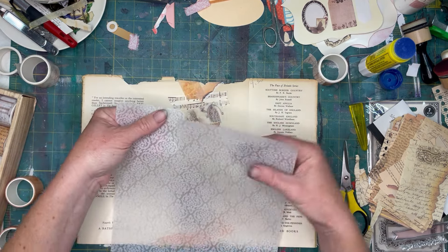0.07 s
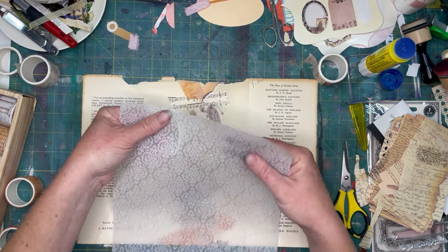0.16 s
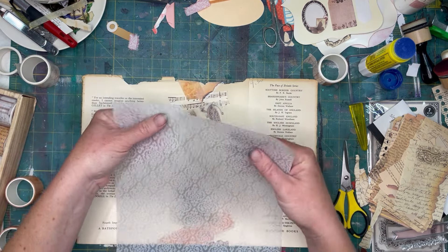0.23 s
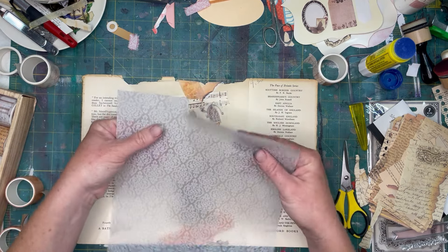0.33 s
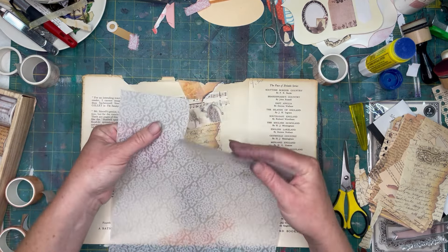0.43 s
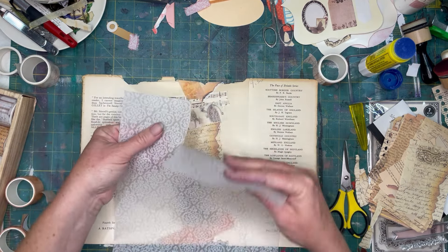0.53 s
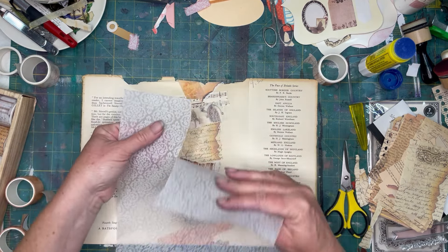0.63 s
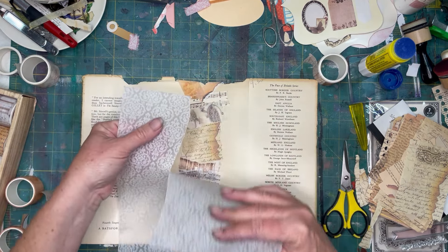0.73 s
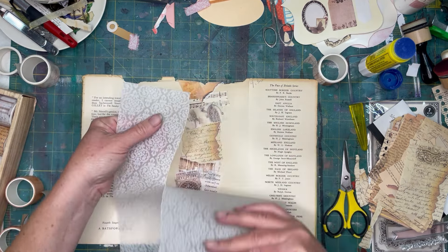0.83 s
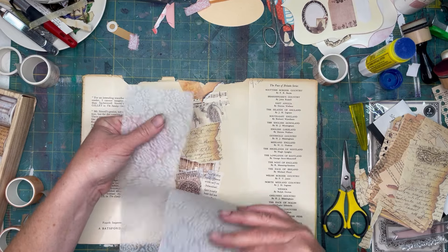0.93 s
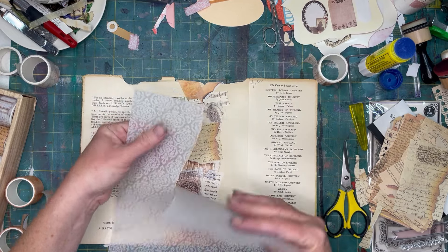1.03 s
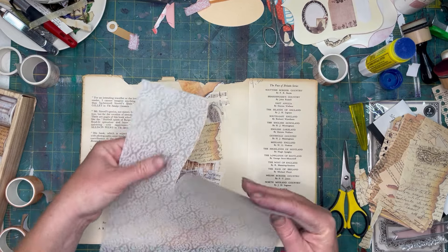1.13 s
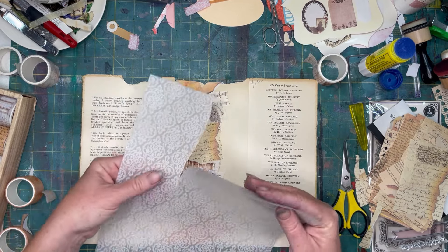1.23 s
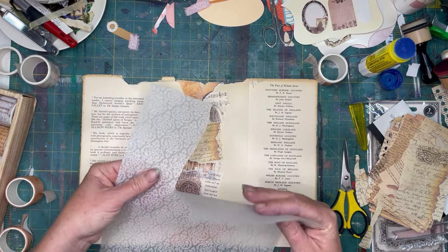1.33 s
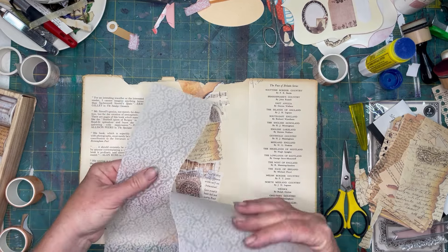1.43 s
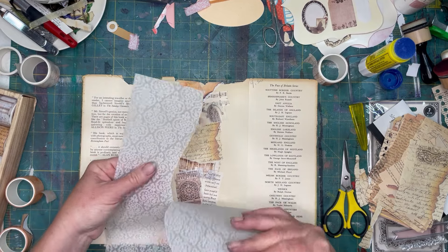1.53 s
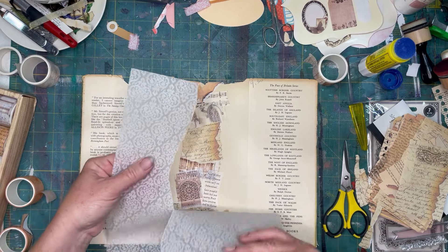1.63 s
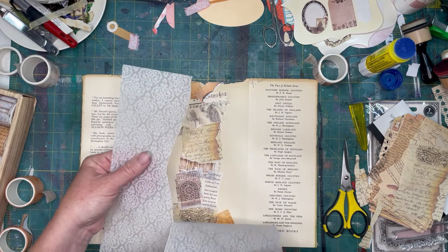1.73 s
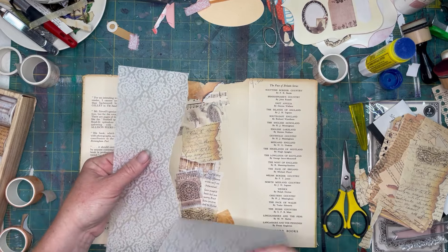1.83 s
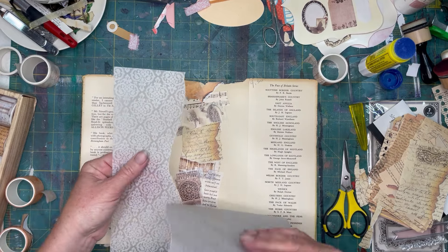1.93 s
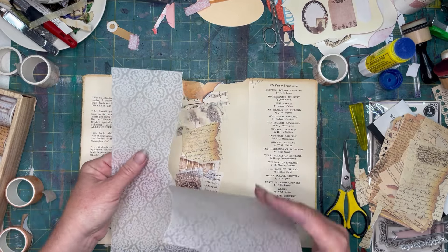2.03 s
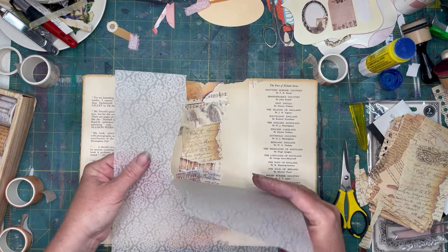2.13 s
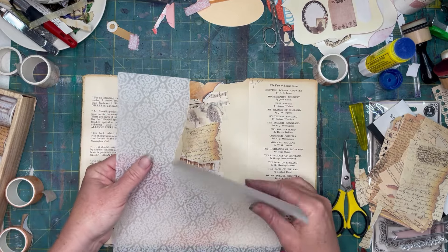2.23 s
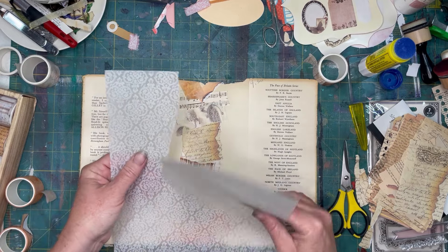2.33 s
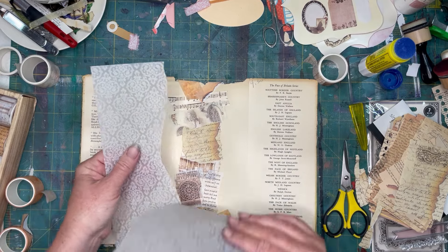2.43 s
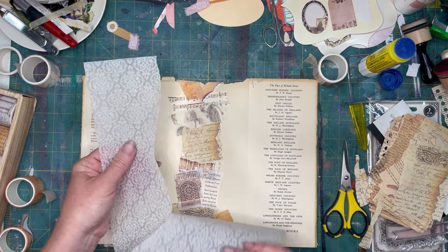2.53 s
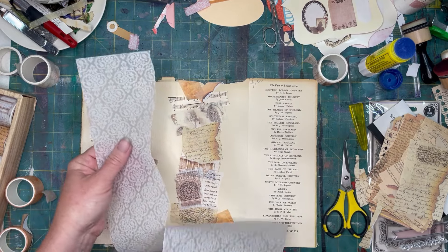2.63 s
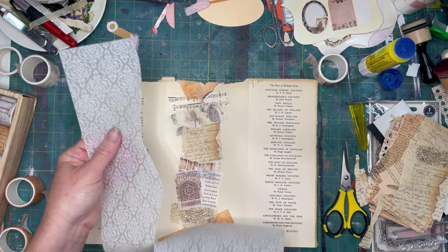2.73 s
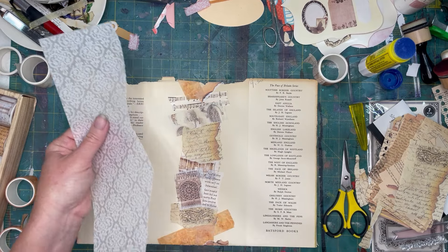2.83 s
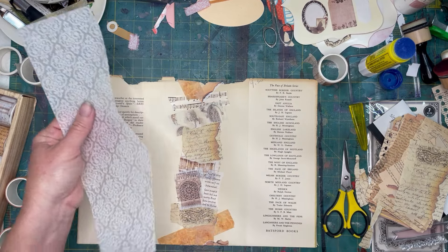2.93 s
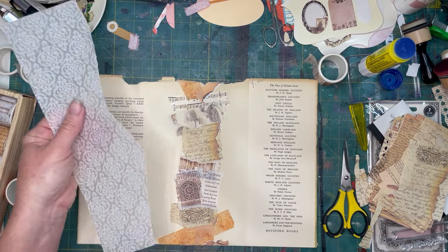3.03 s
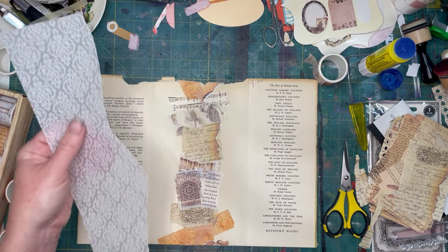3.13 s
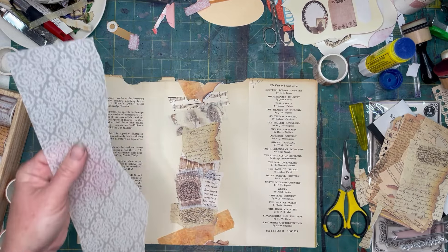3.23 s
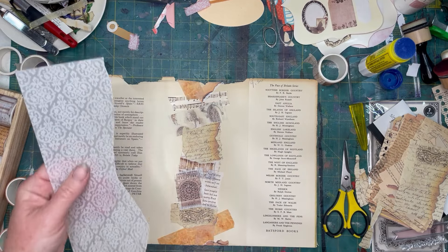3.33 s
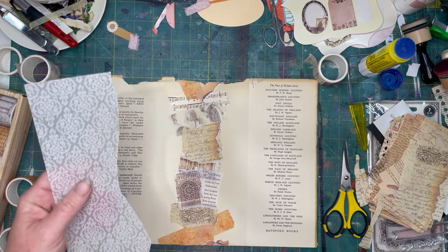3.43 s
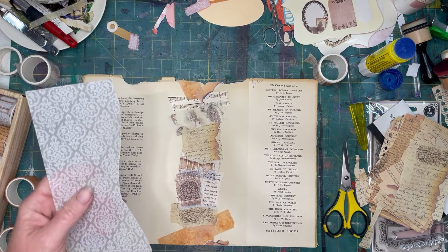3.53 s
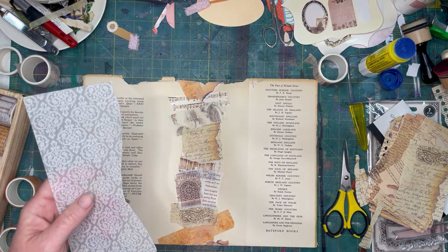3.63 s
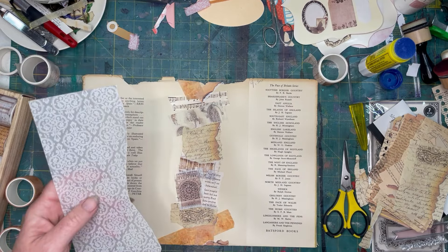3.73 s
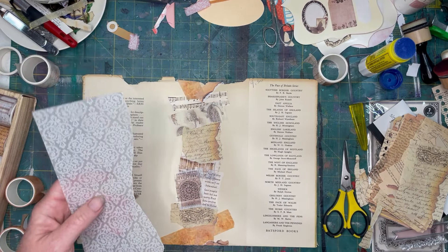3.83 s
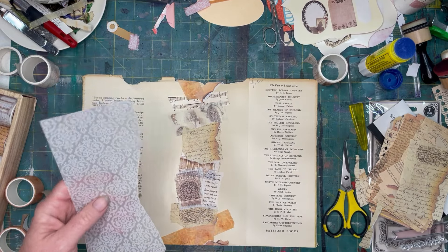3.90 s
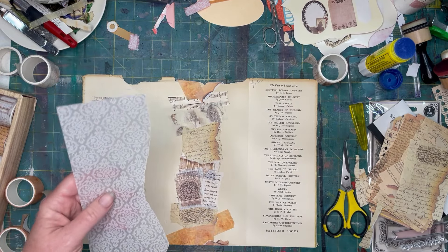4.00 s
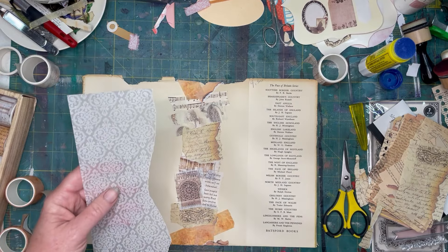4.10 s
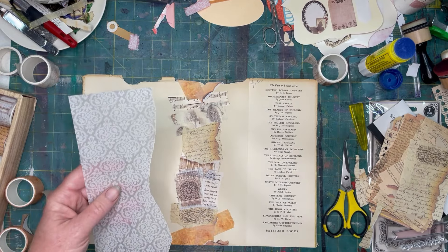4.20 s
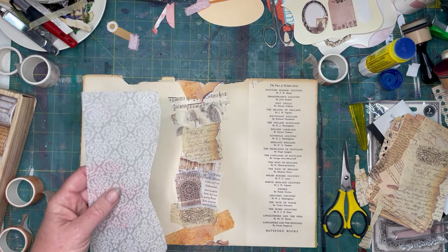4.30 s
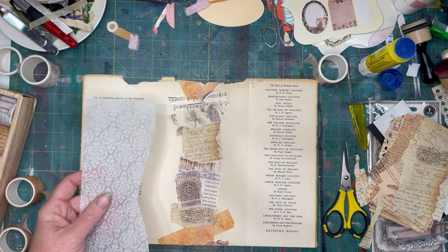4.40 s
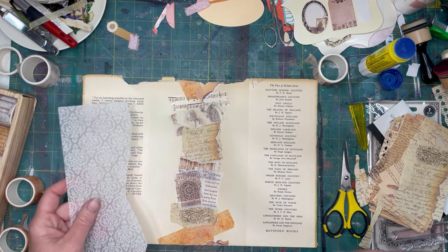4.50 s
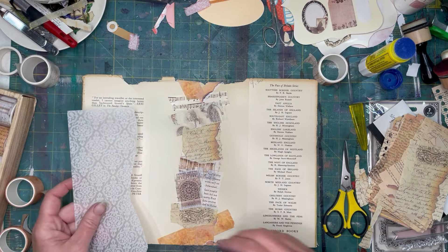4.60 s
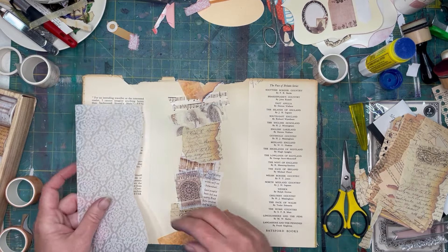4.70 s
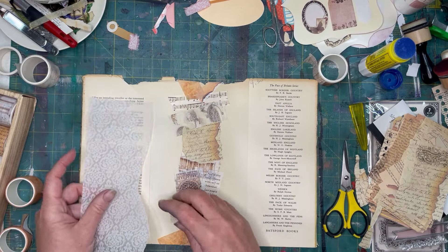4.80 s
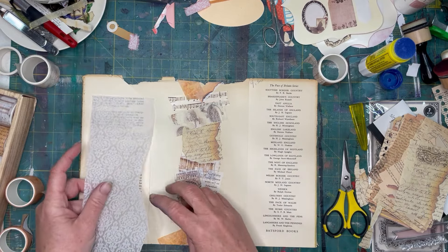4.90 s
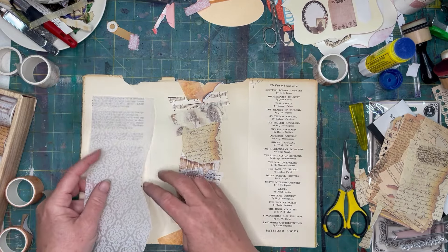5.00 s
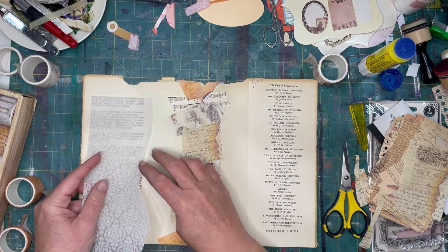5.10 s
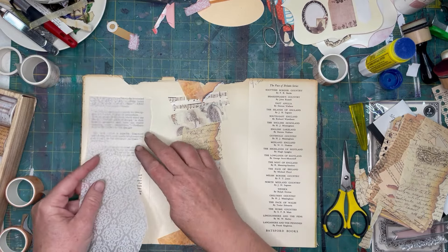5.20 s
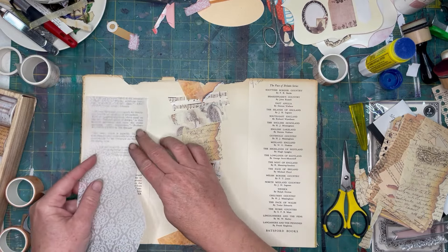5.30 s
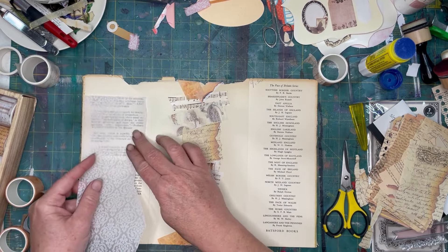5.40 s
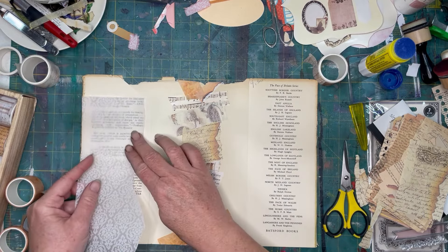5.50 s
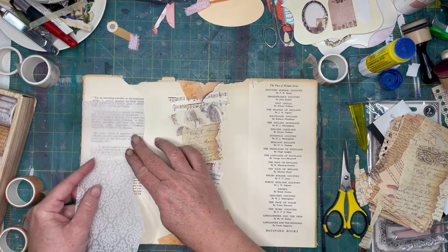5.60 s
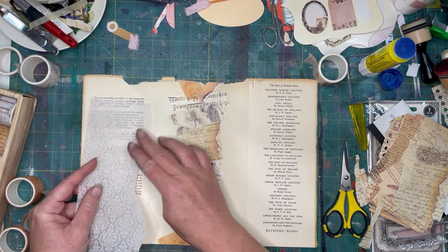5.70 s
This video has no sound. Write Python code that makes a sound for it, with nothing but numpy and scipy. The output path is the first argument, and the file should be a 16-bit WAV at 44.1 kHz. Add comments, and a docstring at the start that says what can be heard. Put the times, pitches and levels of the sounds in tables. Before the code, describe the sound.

Three short, crisp rips of thin paper by hand, with rustling and crease crackles between, then a sharp snap and faint finger strokes.

```python
"""Three short rips of thin paper, torn by hand at a craft table under a small stereo microphone.
Around them the sheet rustles, creases crackle, a fingernail snaps off an edge and fingers slide on a page.
A low room hum and a faint microphone hiss lie underneath. Rips, rustle and strokes are noise built of breaking
fibres; creases are short coloured bursts, the snap is a set of decaying sines, hum and hiss are filtered noise.
Two ports hear it all with differing phase and level, plus a short room tail."""
import sys
import numpy as np
from scipy import signal
from scipy.fft import rfft, irfft, next_fast_len
from scipy.io import wavfile
from scipy.ndimage import uniform_filter1d, map_coordinates

SR = 44100
rng = np.random.default_rng(int(sys.argv[2]) if len(sys.argv) > 2 else 0)


def master(y):
    """Save y as 16-bit WAV."""
    cut = np.clip(np.atleast_2d(y).T, -1, 1)
    pcm = np.round(cut * 32767)  # scale
    wavfile.write(sys.argv[1], SR, pcm.astype(np.int16))


N = 253573

# colour of tearing paper, shared by rips and bursts: f/Hz, level/dB
TEAR_COLOUR = [(200, -16.5), (310, -14.5), (420, -2.5), (520, -4.5), (680, -6.5), (820, -4), (950, -3.5),
               (1350, -1), (2100, -6), (2800, -5), (4000, -9.5), (5300, -12), (7500, -11), (10000, -13.5),
               (13000, -23), (15700, -20)]
LOW_HZ, HIGH_HZ = 900, 3600  # borders between flutter, crackle and fizz


def rips():
    """The tear runs through the sheet; bright patches come and go as the loose flap changes shape."""
    # one list per rip, three bands of the tear: t/s, flutter/dB, crackle/dB, fizz/dB
    tears = [
        [(0.584, -50, -40.5, -37.5), (0.594, -35, -34, -32.5), (0.61, -39, -36, -32),
         (0.658, -39.5, -34, -31.5), (0.674, -32, -33, -33.5), (0.692, -45.5, -32.5, -34),
         (0.736, -39.5, -29, -28.5), (0.802, -39.5, -31.5, -29.5), (0.816, -34.5, -31, -37),
         (0.828, -41, -33, -27.5), (0.854, -30.5, -31, -29), (0.864, -46, -35.5, -36),
         (0.88, -35, -35.5, -28.5), (0.888, -43, -38.5, -38)],
        [(1.486, -42, -32.5, -30), (1.512, -35.5, -33, -34.5), (1.524, -47.5, -36, -34),
         (1.56, -40, -33, -36.5), (1.598, -36.5, -31.5, -35.5), (1.62, -40, -32.5, -35),
         (1.648, -44, -34.5, -29), (1.658, -40, -35.5, -35), (1.666, -33, -32, -31), (1.676, -36, -33.5, -35),
         (1.694, -41, -36.5, -32.5), (1.708, -37, -32.5, -33), (1.774, -44, -38, -38),
         (1.778, -40.5, -34.5, -45.5)],
        [(2.528, -35, -35, -37), (2.544, -41.5, -32, -38), (2.556, -35.5, -29, -34), (2.58, -38.5, -34.5, -34),
         (2.614, -39, -33, -31), (2.63, -41.5, -33, -36), (2.67, -40.5, -32.5, -33.5),
         (2.696, -41.5, -32.5, -30), (2.72, -37, -33.5, -29), (2.756, -39, -33, -30), (2.808, -40, -30, -27.5),
         (2.846, -40.5, -31.5, -29), (2.878, -44, -29.5, -29.5), (2.899, -37, -31.5, -33)],
    ]
    # bands the loose flap favours for a while: start/s, end/s, f/Hz, lift/dB
    # (rows that end well before they start do nothing)
    flap_patches = [(0.579, 0.632, 2400, 5), (0.47, 0.606, 2900, 4.5), (0.632, 0.664, 3100, 7.5),
                    (0.58, 0.668, 2300, 4.5), (0.585, 0.615, 1200, 5), (0.645, 0.668, 2500, 3),
                    (0.81, 0.55, 7000, 2.5), (0.69, 0.73, 3300, 3), (0.592, 0.62, 6100, 7),
                    (0.588, 0.89, 750, -6), (0.64, 0.86, 5300, 3.5), (0.668, 0.892, 370, 5),
                    (0.687, 0.89, 1450, 4), (0.715, 0.81, 5100, 5), (0.725, 0.81, 6200, 4.5),
                    (0.818, 0.89, 5100, 5.5), (0.828, 0.86, 6200, 4.5), (0.818, 0.835, 3500, 4),
                    (0.865, 0.89, 3800, 3.5), (1.481, 1.54, 1400, 5.5), (1.54, 1.58, 1900, 7),
                    (1.58, 1.62, 1600, 8), (1.2, 1.782, 760, -4.5), (1.484, 1.52, 3300, 8.5),
                    (1.3, 2.1, 5500, 2.5), (1.547, 1.6, 3950, 7), (1.628, 1.656, 1400, 4),
                    (1.622, 1.66, 2000, 7.5), (1.7, 1.76, 2600, 8.5), (1.698, 1.74, 5840, 7.5),
                    (2.536, 2.7, 1350, 7), (2.7, 2.775, 1680, 8), (3, 2.78, 2600, 3),
                    (3.1, 2.885, 1500, 2.5), (3, 2.3, 5200, 4.5), (3.4, 3.2, 3560, 6.5),
                    (3.3, 2.83, 4960, 7), (2.796, 2.848, 2780, 10), (2.848, 2.903, 2750, 5),
                    (2.53, 2.66, 990, 1.5), (2.848, 3.4, 6670, 2.5)]
    rise_db_s, fall_db_s = 1204, 1501.5
    flutter_lag = 0.45  # share of the edge slope: flutter comes and goes more slowly
    rip_edges = [edges(rows[0][0], rows[-1][0], rise_db_s, fall_db_s) for rows in tears]
    edge_db = np.max(rip_edges, axis=0)
    flutter_db, crackle_db, fizz_db = curves(np.concatenate(tears))
    torn = fibres(spiky_db=2.0, clump_db=0.9, patchy_db=1.3, pops_db=12.5, snaps_db=16.5, slow_share=.3)
    torn = patched(torn, flap_patches)
    return sheet(torn, TEAR_COLOUR, flutter_db + flutter_lag * edge_db, crackle_db + edge_db, fizz_db + edge_db)


def handling():
    """Fingers rub and bend the loose sheet until it is laid down: clumpier, more uneven breaks."""
    # hands moving the sheet: t/s, rustle/dB, tilt toward the treble/dB
    moves = [(0.0, -59.5, -0.5), (0.09, -63.5, 7), (0.138, -57.5, -6.5), (0.306, -58.5, 3.5),
             (0.486, -54, 0), (0.56, -65, -2), (0.9, -51.5, 0.5), (0.99, -46, 0), (1.012, -56.5, 10.5),
             (1.03, -49, -2.5), (1.058, -61, 0), (1.2, -60, -2.5), (1.27, -57.5, -3.5), (1.335, -68, 0.5),
             (1.37, -54, 2), (1.42, -62, -2), (1.45, -54.5, -4), (1.834, -54, -1), (1.974, -67, 5),
             (2.17, -61, 6.5), (2.235, -59.5, 4.5), (2.294, -50.5, -5.5), (2.444, -58, 0.5), (2.47, -47, 2),
             (2.92, -51.5, -1), (2.96, -52.5, -5), (3.03, -56, -7.5), (3.08, -48, -2), (3.12, -54, -3.5),
             (3.15, -56.5, -2), (3.185, -57, -4), (3.21, -63.5, 7), (3.41, -63.5, 4), (3.538, -59.5, -2),
             (3.6, -63, -2), (3.78, -70.5, 1), (3.87, -57.5, -6.5), (3.9, -65, 2), (3.94, -63.5, 1),
             (3.99, -73.5, 5), (4.058, -58.5, -7), (4.152, -56, 0), (4.2, -61, 1), (4.29, -62.5, 0.5),
             (4.36, -65.5, 3), (4.41, -61.5, 1), (4.458, -58.5, 0), (4.5, -61.5, 4), (4.55, -61.5, 4),
             (4.6, -59.5, 4), (4.626, -48.5, 3.5), (4.645, -54, 4.5), (4.662, -61, 0.5), (4.72, -63.5, 8.5),
             (4.79, -57.5, 2), (4.9, -68, 2.5)]
    # rubbing colour: f/Hz, level/dB
    rub_colour = [(200, -2), (350, -1.5), (650, -4), (900, -6), (1350, -3.5), (2800, -6.5), (4000, -10),
                  (7500, -12), (10000, -16.5), (13000, -24), (15700, -21)]
    rustle_db, tilt_db = curves(moves)
    held = np.clip((moves[-1][0] - np.arange(N) / SR) * 20, 0, 1)  # fades over the last 50 ms
    rubbed = fibres(spiky_db=0.5, clump_db=4.5, patchy_db=3.0, pops_db=14.0, snaps_db=13.0)
    flutter_db = rustle_db - 3 - tilt_db
    fizz_db = rustle_db - 1.5 + tilt_db
    return held * sheet(rubbed, rub_colour, flutter_db, rustle_db, fizz_db)


def creases():
    """Creases buckle at once; scrunches build up over some milliseconds."""
    # sharp creases: t/s, nominal peak/dB, pitch f/Hz, treble before the bite/dB, t60/s
    sharp_creases = [(0.106, -38, 1170, -19, 0.033), (0.122, -40.5, 1180, -19, 0.027),
                     (0.149, -24.5, 2880, -17, 0.046), (0.174, -39, 1300, -17.5, 0.054),
                     (0.226, -29.5, 1500, -4.5, 0.09), (0.232, -19.5, 1300, -5, 0.026),
                     (0.251, -31.5, 1160, -0.5, 0.062), (0.284, -34, 1294, 3.5, 0.036),
                     (0.2905, -22, 2640, -2.5, 0.028), (0.293, -22.5, 1920, -8, 0.044),
                     (0.355, -27, 830, -22.5, 0.045), (0.469, -34, 1120, -15.5, 0.18),
                     (0.581, -26, 2580, -15.5, 0.035), (0.592, -21, 2680, -6.5, 0.04),
                     (0.7395, -17, 1995, -2, 0.012), (0.929, -31.5, 2930, -16, 0.065),
                     (0.974, -27.5, 2830, -11, 0.063), (1.018, -25, 2090, -9.5, 0.049),
                     (1.224, -31, 1100, -21, 0.14), (1.345, -29.5, 1290, -24, 0.088),
                     (1.428, -19.5, 2860, -11, 0.048), (1.472, -28.5, 2490, -9.5, 0.082),
                     (1.6642, -9.5, 1290, -7.5, 0.022), (1.667, -10.5, 1300, -11.5, 0.02),
                     (1.768, -30.5, 5500, 1.5, 0.017), (1.772, -25, 2920, -8, 0.018),
                     (1.774, -26.5, 1300, -20.5, 0.06), (1.865, -19.5, 1380, -24.5, 0.085),
                     (1.866, -18.5, 2950, -19, 0.04), (1.938, -34, 810, -23.5, 0.17),
                     (2.254, -30, 955, -27, 0.076), (2.303, -44, 1180, -9.5, 0.053),
                     (2.334, -20, 3140, -7.5, 0.03), (2.335, -24, 1070, -20.5, 0.1),
                     (2.46, -35, 1500, -12, 0.05), (2.469, -21.5, 770, -29.5, 0.041),
                     (2.526, -29, 1420, -7, 0.21), (3.163, -34.5, 850, -18, 0.06),
                     (3.833, -25.5, 3500, -22, 0.018), (4.06, -44, 980, -24.5, 0.15),
                     (4.078, -39.5, 1110, -14.5, 0.061), (4.44, -46, 1500, -23, 0.089),
                     (4.815, -32.5, 1290, -28, 0.04), (4.897, -41, 4000, -6.5, 0.02),
                     (5.171, -55, 3320, -0.5, 0.034), (5.499, -62, 3880, 3.5, 0.04),
                     (5.661, -57.5, 4260, 8, 0.069)]
    # scrunches that swell and fade: t/s, nominal peak/dB, pitch f/Hz, treble before the bite/dB, t60/s
    soft_scrunches = [(0.139, -29, 1200, -30.5, 0.06), (0.148, -22.5, 1260, -31, 0.051),
                      (0.213, -34, 1850, -4, 0.026), (0.233, -29.5, 1540, -6, 0.04),
                      (0.262, -25.5, 1400, -15.5, 0.05), (0.274, -28.5, 1180, -12, 0.051),
                      (0.295, -26, 1400, -9.5, 0.021), (0.429, -36, 1240, -27, 0.057),
                      (0.56, -24.5, 2520, -4.5, 0.025), (1.284, -37, 835, -16, 0.074),
                      (2.276, -35.5, 2530, -6, 0.04), (2.392, -34.5, 1600, -13.5, 0.035),
                      (2.488, -33.5, 987, -12.5, 0.09), (1.806, -36.5, 1300, -4.5, 0.065),
                      (1.852, -38, 1300, -21.5, 0.05), (2.906, -24, 1145, -20, 0.13),
                      (2.926, -37, 1000, -1, 0.04), (2.978, -24, 1003, -14, 0.1),
                      (2.989, -26.5, 1080, -2, 0.048), (2.998, -26.5, 980, -9, 0.033),
                      (3.058, -28, 2530, -23.5, 0.055), (3.124, -46, 5940, 6.5, 0.079),
                      (3.178, -52, 2350, 7, 0.077), (3.197, -50.5, 2330, 9, 0.05),
                      (3.808, -41.5, 1200, -31, 0.3), (3.868, -42.5, 830, -10, 0.075),
                      (5.284, -51, 1530, -19, 0.033)]
    crest_db, crisp_db = 10.5, 5  # peak of a burst over its body; extra bite of its treble
    thin_hz = 298  # a thin sheet gives little below this
    out = np.zeros(N + SR)
    # rise in s; click is the buckling itself, a spike in rms of the noise before colouring
    for table, rise, click in ((sharp_creases, .0008, 3.65), (soft_scrunches, 0.0098, 0)):
        for s, db, pitch_hz, treble_db, t60 in table:
            crackle = burst(pitch_hz, treble_db + crisp_db, rise, t60, click)
            onset = round((s - .7 * rise) * SR)
            out[onset:][:len(crackle)] += amp(db - crest_db) * crackle
    return filtered(out[:N], lambda hz: (1j * hz / (1j * hz + thin_hz)) ** 2)


def snap():
    """A taut edge slips off the nail: decaying modes ring for a few ms as a noise burst makes the sheet shiver."""
    # nail snaps: t/s, level before a 2.5 dB lift/dB
    nail_snaps = [(4.7403, -8)]
    # ringing modes of the edge: f/Hz, level/dB, t60/s
    edge_modes = [(490, -25.5, 0.019), (1210, -7.5, 0.0078), (1986, 0.5, 0.0069), (3010, -2.5, 0.0044),
                  (4880, -4, 0.0079), (5260, -2, 0.01), (6990, 8.5, 0.0043), (8870, -4.5, 0.0045),
                  (10400, 2, 0.0073)]
    out, t = np.zeros(N + SR), np.arange(8192) / SR
    for s, db in nail_snaps:
        ring = np.zeros(len(t))
        for k, (hz, level, t60) in enumerate(edge_modes):
            ring += amp(level - 60 * t / t60) * (-1) ** k * np.sin(2 * np.pi * hz * t)
        shiver = amp(-24.0) * burst(2200, 6.3, 0.0029, 0.03)
        attack = (1 - np.exp(-t / 0.00052)) ** 2
        out[round(s * SR):][:len(t)] += amp(db + 2.5) * attack * (ring + shiver)
    return out[:N]


def strokes():
    """Skin slides over the page: a soft, bright friction noise over the dull body of the book."""
    # fingers smoothing the page:
    # start/s, end/s, level at start/dB, level at end/dB, relative fine hiss/dB, scratch f/Hz, its lift/dB
    finger_strokes = [(4.876, 4.982, -62.5, -60.5, -7.5, 4230, 4),
                      (5.015, 5.05, -60, -59.5, -10.5, 3600, 9), (5.065, 5.098, -62, -61, -9, 3900, 7),
                      (5.116, 5.152, -69.5, -74, 0.5, 3900, 2), (5.163, 5.27, -67, -64.5, -0.5, 3000, 4),
                      (5.407, 5.441, -68, -63, -3, 3100, 1), (5.52, 5.637, -63.5, -63, -2.5, 4100, 4.5),
                      (5.659, 5.763, -62.5, -59.5, -2.5, 4000, 2)]
    # skin on the page: f/Hz, level/dB
    page_colour = [(220, -17.5), (340, -3.5), (500, -12.5), (900, -18), (1350, -2), (2100, -4), (2800, 2.5),
                   (4300, -2.5), (5300, -8.5), (7500, -14), (10000, -20.5), (13000, -28), (15700, -26)]
    rise_db_s, fall_db_s, resting_db = 896, 700, -83  # edges of a stroke; fingers at rest
    book_s, book_db, book_rest_db = (4.42, 4.88), -63, -89  # the sheet is laid on the book, whose body rumbles
    book_rise_db_s, book_fade_db_s = 34, 56

    points = []
    for start, end, start_db, end_db, fine, *_ in finger_strokes:
        points += [(start, start_db, fine), (end, end_db, fine)]
    level_db, fine_db = curves(points)
    edge_db = np.max([edges(a, b, rise_db_s, fall_db_s) for a, b, *_ in finger_strokes], axis=0)
    touch_db = edges(finger_strokes[0][0], N / SR, rise_db_s, 0)
    friction_db = np.maximum(level_db + edge_db, resting_db + touch_db)
    body_db = np.maximum(book_db + edges(*book_s, book_rise_db_s, book_fade_db_s), book_rest_db)

    skin = fibres(spiky_db=4.0, clump_db=1.5, patchy_db=1.8, pops_db=10.5, snaps_db=14.5)
    skin = patched(skin, [(a, b, hz, lift_db) for a, b, *_, hz, lift_db in finger_strokes])

    def bands(hz):
        body = 1 / (1 + (hz / 650) ** 8)
        fine = 1 / (1 + (6000 / (hz + 1)) ** 8)
        return amp(along(page_colour, hz)) * (hz > 200) * np.array([body, 1 - body - fine, fine])

    levels = (body_db, friction_db, friction_db + fine_db)
    return sum(amp(level) * unit(part) for level, part in zip(levels, filtered(skin, bands)))


def hum():
    """Low rumble of the room, filtered noise swelling when the hands shake the table."""
    # steady room hum: t/s, level/dB
    hum_levels = [(0, -60), (3, -61), (5.75, -67)]
    # hum colour: f/Hz, level/dB
    hum_colour = [(12, -51), (20, -28), (80, 3.5), (128, 0), (146, -4.5), (188, -1), (222, -10.5),
                  (420, -25.5), (550, -22.5), (920, -120)]
    # the hands jog the table: t/s, peak level/dB
    jogs = [(0.24, -54), (0.62, -49.5), (0.8, -49), (1.0, -52.5), (1.15, -52.5), (1.44, -48.5),
            (1.699, -41.5), (1.97, -50), (2.32, -52.5), (2.56, -42.5), (2.89, -47.5), (3.0, -50),
            (3.18, -54), (3.86, -52), (4.08, -49)]
    rise_db_s, fall_db_s = 172.5, 152
    steady_db, = curves(hum_levels)
    swells = [peak_db + edges(s, s, rise_db_s, fall_db_s) for s, peak_db in jogs]
    db = np.max([steady_db] + swells, axis=0)
    rumble = filtered(rng.standard_normal(N), lambda hz: amp(along(hum_colour, hz)))
    return amp(db + 1.4 * wobble(23)) * unit(rumble)


def hiss():
    """Faint steady hiss of the microphone: coloured noise."""
    # hiss colour: f/Hz, level/dB
    hiss_colour = [(200, -14), (500, 2), (1000, -7), (3000, 3.5), (8000, -6), (12000, -15), (15500, -5.5)]
    return amp(-74.0) * unit(filtered(rng.standard_normal(N), lambda hz: amp(along(hiss_colour, hz))))


def room(x):
    """Two unrelated reverberant tails, each frequency dying at its own speed, drawn anew every 0.3 s."""
    # room decay: f/Hz, t60/s
    decay = [(300, 0.2), (2000, 0.079), (10000, 0.048)]
    # sound unrelated at the two ports: f/Hz, relative level/dB
    diffuse_colour = [(60, -29.5), (150, -23), (640, -7.5), (1400, -14), (2800, -7), (4500, -6.5),
                      (7000, -8.5), (9500, -6.5), (10500, -38.5), (13500, -33.5), (15000, 1.5)]
    step = round(.3 * SR)
    wet = np.zeros((2, N + SR))
    for start in range(0, N, step):
        hz, t, z = signal.stft(rng.standard_normal((2, SR // 5)), SR, nperseg=256)
        fade = amp(-60 * t / along(decay, hz)[:, None])
        tail = signal.istft(z * fade, SR, nperseg=256)[1]
        part = signal.fftconvolve(x[None, start:start + step], tail / np.linalg.norm(tail[0]), axes=1)
        wet[:, start:start + part.shape[1]] += part
    return filtered(wet[:, :N], lambda hz: amp(along(diffuse_colour, hz)))


def fibres(spiky_db, clump_db, patchy_db, pops_db, snaps_db, slow_share=1):
    """Fibres breaking: spiky, clumped noise with pops and ringing snaps, coloured by shifting patches."""
    size_db = spiky_db * wobble(2500) + clump_db * (wobble(220) + slow_share * wobble(45))
    # no fibre is much stronger than the rest
    breaks = rng.standard_normal(N) * amp(4.5 * np.tanh(size_db / 9))
    chance, size = rng.random((2, N))
    # strong fibres, about 700 a second, all let the sheet spring back the same way
    pops = (chance < 700 / SR) * size
    snaps = sum(ringing(hz) for hz in np.geomspace(900, 7500, num=9))
    z = signal.stft(breaks - amp(pops_db) * pops + amp(snaps_db) * snaps, nperseg=256)[2]
    field = uniform_filter1d(rng.standard_normal(z.shape), size=2, axis=0)  # across frequency
    field = uniform_filter1d(field, size=14, axis=1)  # along time
    return unit(signal.istft(z * amp(patchy_db * unit(field)), nperseg=256)[1][:N])


def ringing(hz):
    """Scattered fibre snaps of one pitch, each ringing for about a cycle or a few."""
    rate, decay_cycles = 130, 0.79  # snaps a second; decay constant in cycles
    chance, size = rng.random((2, N))
    cycles = np.arange(round(8 * SR / hz)) * hz / SR
    ring = -np.sin(2 * np.pi * cycles) * cycles * np.exp(-cycles / decay_cycles)
    ring = ring / np.linalg.norm(ring) * np.sqrt(hz / 3000)
    return signal.fftconvolve((chance < rate / SR) * size ** 2, ring)[:N]


def sheet(x, colour, flutter_db, crackle_db, fizz_db):
    """The coloured sheet, split into flutter, crackle and fizz that each follow their own level."""
    def bands(hz):
        low = 1 / (1 + (hz / LOW_HZ) ** 6)
        high = 1 / (1 + (HIGH_HZ / (hz + 1)) ** 6)
        return amp(along(colour, hz)) * (hz > 200) * np.array([low, 1 - low - high, high])

    levels = (flutter_db, crackle_db, fizz_db)
    return sum(amp(db) * unit(part) for db, part in zip(levels, filtered(x, bands)))


def patched(x, patches):
    """Lifts or dips a band for a while, once per (start s, end s, Hz, lift dB) row."""
    width_hz, widens, fade_s = 230, 0.053, 0.0067  # width: Hz plus a share of the centre frequency
    hz, t, z = signal.stft(x, SR, nperseg=256)
    lift_db = 0
    for start, end, centre, lift in patches:
        presence = np.clip(.5 + np.minimum(t - start, end - t) / fade_s, 0, 1)
        bell = np.exp(-((hz[:, None] - centre) / (width_hz + widens * centre)) ** 2)
        lift_db = lift_db + lift * presence * bell
    return signal.istft(z * amp(lift_db), SR, nperseg=256)[1][:N]


def burst(pitch_hz, treble_db, rise, t60, click=0):
    """A noise burst of the sheet around its pitch; the treble dies faster."""
    crack_db, crack_t60_s = -9, 0.032  # the first moment of a burst is louder
    crisp_hz, crisp_lift = 5540, 0.94  # extra bump in the treble
    t = np.arange(8192) / SR
    hz = np.fft.rfftfreq(len(t), 1 / SR)
    bump = 1 + 1.4 * np.exp(-(np.log((hz + 1) / pitch_hz) / 0.31) ** 2)
    spike = click * (np.arange(len(t)) == round(rise * SR))
    noise = rfft(rng.standard_normal((2, len(t))) + spike)
    noise = noise * amp(along(TEAR_COLOUR, hz)) * (hz > 200) * bump
    body = unit(irfft(noise[0] / (1 + (hz / 4500) ** 4)))
    crisp_bump = 1 + crisp_lift * np.exp(-(np.log((hz + 1) / crisp_hz) / 0.14) ** 2)
    crisp = unit(irfft(noise[1] * crisp_bump / (1 + (HIGH_HZ / (hz + 1)) ** 6)))
    # uneven little breaks: 1 dB steps of a random curve, 500 knots a second
    uneven = np.interp(t * 500, np.arange(100), rng.standard_normal(100))
    grain = amp(np.minimum(t / .006, 1) * uneven)
    fall = np.maximum(t - rise, 0) / max(t60, .01)
    crack = 1 + amp(crack_db - 60 * t / crack_t60_s)
    attack = np.minimum(t / max(rise, 1e-4), 1) ** 2
    return grain * crack * attack * (body * amp(-60 * fall) + amp(treble_db) * crisp * amp(-90 * fall))


def edges(start, end, rise_db_s, fall_db_s):
    """Envelope in dB: rises to the start, holds at 0, falls after the end."""
    t = np.arange(N) / SR
    return -rise_db_s * np.maximum(start - t, 0) - fall_db_s * np.maximum(t - end, 0)


def curves(rows):
    """One value per sample for each column after the time."""
    s, *cols = np.transpose(rows)
    return [np.interp(np.arange(N) / SR, s, c) for c in cols]


def wobble(rate):
    """A smooth random curve, rate knots a second."""
    knots = rng.standard_normal(int(N * rate / SR) + 4)
    return map_coordinates(knots, [np.arange(N) * rate / SR])


def along(points, hz):
    """Reads (Hz, value) points on a log frequency axis."""
    f, v = np.transpose(points)
    return np.interp(np.log(hz + 1), np.log(f + 1), v)


def filtered(x, response):
    """x times a complex response of frequency."""
    m = next_fast_len(N + SR // 2)
    return irfft(rfft(x, m) * response(np.fft.rfftfreq(m, 1 / SR)), m)[..., :N]


def amp(db):
    """Decibels to a linear gain."""
    return 10 ** (np.asarray(db) / 20)


def unit(x):
    """Scales to an rms of one."""
    return x / np.sqrt(np.mean(x ** 2) + 1e-20)


def scene():
    """The two ports hear the table with a phase and level difference that depends on frequency."""
    # phase by which the left port leads: f/Hz, phase/rad
    port_phase = [(200, 0), (400, -.35), (620, -1.1), (1030, -.3), (2000, .1), (2670, .5), (3530, .8),
                  (4740, .2), (6460, 1.7), (8700, 2.4), (9730, np.pi), (13700, np.pi), (15300, 4.2)]
    # left level over right: f/Hz, level/dB
    port_balance = [(60, 0), (200, 1), (380, 3), (700, -2), (1300, -.7), (2800, -2.4), (5500, -.3),
                    (9000, 0)]
    table = rips() + handling() + strokes() + creases() + snap() + hum() + hiss()
    half = np.array([[.5], [-.5]])  # each port takes half of the difference

    def ports(hz):
        return amp(half * along(port_balance, hz)) * np.exp(1j * half * along(port_phase, hz))

    return filtered(table, ports) + room(table)


def record(dry):
    """The recorder keeps nothing above its band limit of 15.9 kHz."""
    return filtered(dry, lambda hz: hz < 15900)


dry = scene()
out = record(dry)
master(out)
```